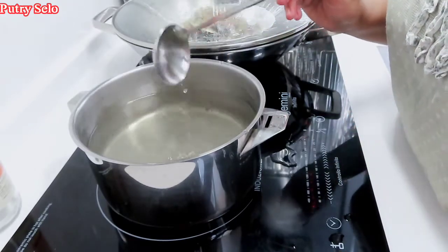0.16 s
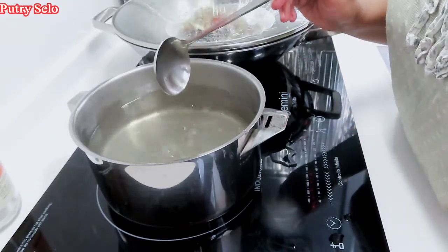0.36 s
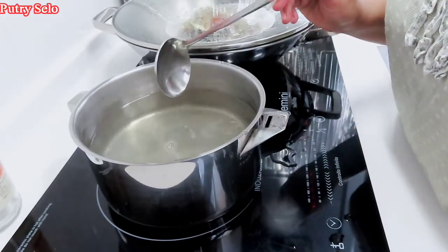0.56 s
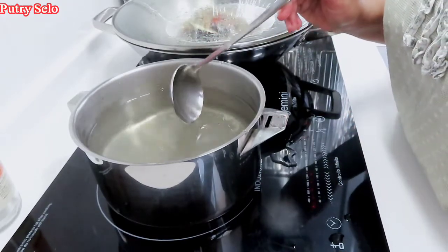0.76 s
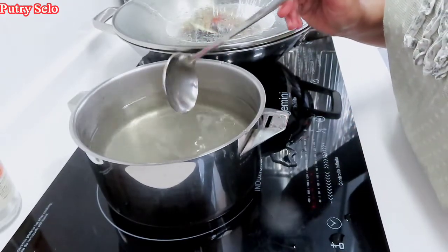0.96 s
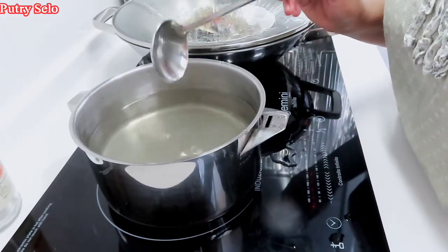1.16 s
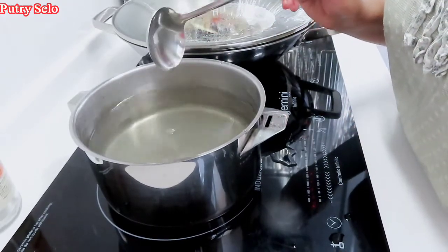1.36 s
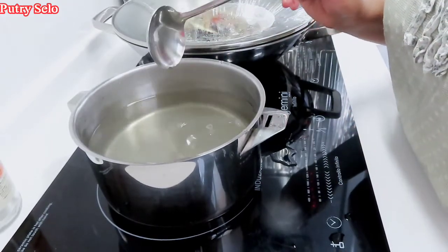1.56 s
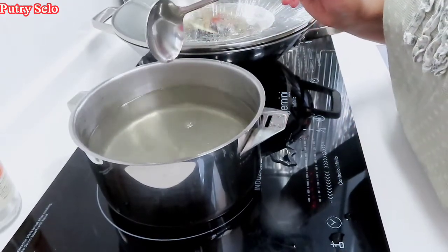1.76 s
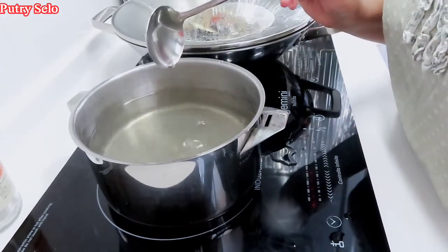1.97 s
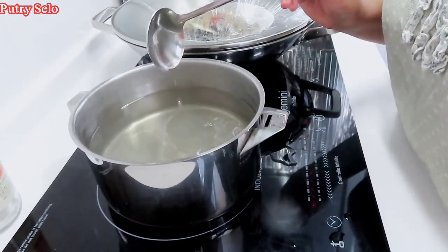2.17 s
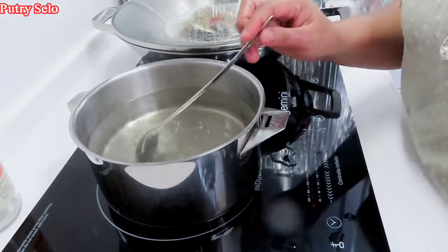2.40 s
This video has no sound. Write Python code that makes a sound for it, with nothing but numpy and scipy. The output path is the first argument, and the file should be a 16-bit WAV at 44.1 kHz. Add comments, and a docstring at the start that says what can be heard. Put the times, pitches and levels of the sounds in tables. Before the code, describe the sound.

An induction hob hums low and wavering while a drop of syrup plinks into a pot

```python
"""An induction hob heats a pot of syrup in a kitchen: three small motors, built from sine partials, hum
and beat against each other, and the coil buzzes faintly on multiples of twice the mains frequency.
Cooling air rushes beneath as shaped noise, wider in the treble. A soft knock on the pot, made of decaying
modes and a dull scuff, dies away. Syrup drips from a raised spoon: one plink, a rising bubble tone, then
a few tiny noise ticks and a faint fizz. The drips echo inside the pot and the kitchen."""
import sys
import numpy as np
from scipy import signal
from scipy.fft import rfft, irfft, next_fast_len
from scipy.io import wavfile
from scipy.ndimage import uniform_filter1d, map_coordinates

SR = 44100
rng = np.random.default_rng(int(sys.argv[2]) if len(sys.argv) > 2 else 0)


def int16_out(signal):
    """Quantize to a 16-bit WAV file."""
    q = np.round(np.clip(np.atleast_2d(signal).T, -1, 1) * 32767)
    wavfile.write(sys.argv[1], SR, q.astype(np.int16))


N = 107427

# Partials of the cooling fan's hum: multiple of FAN_HZ [1], rms level/dB
FAN_PARTIALS = [(1, -26.5), (2, -67.5), (3, -60.5), (4, -60.5), (8, -60.5), (9, -62)]
# Partials of the second motor's hum: multiple of MOTOR_HZ [1], rms level/dB
MOTOR_PARTIALS = [(1, -45.5), (2, -32.5), (3, -36.5), (4, -54.5), (8, -45.5), (9, -61), (10, -55.5),
                  (15, -74), (20, -61), (21, -65)]
# Partials of the third motor's whirr: multiple of WHIRR_HZ [1], rms level/dB
WHIRR_PARTIALS = [(4, -74.5), (8, -57), (12, -50), (16, -63.5)]
# Partials of the coil's buzz: multiple of COIL_HZ [1], rms level/dB
COIL_PARTIALS = [(1, -44.5), (9, -63), (10, -66), (12, -72.5), (13, -70.5), (15, -66.5), (20, -67.5),
                 (23, -69.5), (24, -73), (26, -74.5), (28, -76), (46, -79), (57, -83)]
# Weak tones that make the low hum waver: f/Hz, rms level/dB
BEAT_TONES = [(104.6, -44.5), (153.6, -58.5)]
# Cooling air common to both sides: f/Hz, density level/dB [per Hz]
AIR_MID = [(25, -79), (40, -86), (55, -61.5), (72, -66.5), (90, -58.5), (106, -57), (130, -64), (170, -67),
           (230, -82), (290, -71.5), (365, -75), (420, -72.5), (465, -63), (520, -72.5), (600, -70),
           (820, -74.5), (1050, -79), (1300, -83), (1900, -82.5), (2500, -87.5), (3200, -93.5), (4200, -99),
           (5500, -100), (8000, -106), (10500, -111), (13000, -114), (15500, -123)]
# Cooling air of opposite sign on the two sides: f/Hz, density level/dB [per Hz]
AIR_SIDE = [(40, -119), (65, -109), (115, -95), (220, -87.5), (330, -81), (600, -84.5), (830, -83),
            (1050, -89), (1700, -92), (3000, -96.5), (5000, -101), (10000, -112), (15000, -118)]
# Modes of the knocked pot: f/Hz, peak level/dB before the soft onset, decay time to -60 dB t/s
POT_MODES = [(278, -28.5, 0.42), (298, -23, 0.076), (830, -37, 0.25), (1900, -32, 0.064), (2014, -47, 0.36)]
# Drops striking the syrup: onset t/s, starting level/dB, centre f/Hz, bandwidth [octaves]
DROP_HITS = [(0.0975, -30.5, 5400, .95), (0.7935, -42, 4700, .35), (0.8125, -53, 5000, 0.27),
             (.8295, -56, 13000, .25)]

FAN_HZ, MOTOR_HZ, WHIRR_HZ, COIL_HZ = 123.9, 48.86, 54.22, 100.03
DRIFT_HZ = 0.06  # scale of each motor's random pitch drift
FLUTTER_DB = 0.43  # scale of each partial's random level flutter
KNOCK_S, KNOCK_RISE_S = 0.0, 0.0017
SCUFF_DB, SCUFF_HZ, SCUFF_OCTAVES, SCUFF_T60_S = -42, 1780, 0.62, 0.2
SPLAT_T60_S = 0.0047
PLINK_S, PLINK_DB = 0.0983, -22.5
BUBBLE_HZ, BUBBLE_RISE_HZ_PER_S = 2410, 15000
BUBBLE_SWELL_S, BUBBLE_HOLD_S, BUBBLE_T60_S = 0.001, 0.003, 0.012
CRATER_DB, CRATER_HZ, CRATER_OCTAVES, CRATER_T60_S = -26, 2700, 0.25, 0.012
POT_ECHO_DB, POT_ECHO_T60_S = -2.5, 0.053
KITCHEN_DB, KITCHEN_T60_S = -14, 0.36
ECHO_CORNER_HZ = 6950
FIZZ_S, FIZZ_WIDTH_S = 0.835, 0.03  # centre and standard deviation of the swell
FIZZ_DB, FIZZ_HZ, FIZZ_OCTAVES, FIZZ_PER_S = -67.5, 13000, 0.3, 900
TOP_HZ = 15600


def amp(db):
    """Decibels to gain."""
    return 10 ** (np.asarray(db) / 20)


def unit(x):
    """Scale to rms 1."""
    return x / np.sqrt(np.mean(x ** 2) + 1e-20)


def since(s):
    """Seconds elapsed since s, zero before it."""
    return np.maximum(np.arange(N) / SR - s, 0)


def wobble(rate):
    """A smooth random curve through rate random knots a second."""
    knots = rng.standard_normal(int(N * rate / SR) + 4)
    return map_coordinates(knots, [np.arange(N) * rate / SR])


def filtered(x, response):
    """Shape the spectrum of x with a function of frequency in Hz."""
    m = next_fast_len(N + SR // 2)
    spectrum = rfft(x, m) * response(np.fft.rfftfreq(m, 1 / SR))
    return irfft(spectrum, m)[..., :N]


def band(x, centre, width):
    """Keep a band that is bell-shaped over octaves; width is its standard deviation."""
    return filtered(x, lambda hz: np.exp(-0.5 * (np.log2((hz + 1) / centre) / width) ** 2))


def burst(s, db, centre, width, t60):
    """A decaying burst of noise in one band, its envelope starting at the given level."""
    t = since(s)
    envelope = (t > 0) * amp(db - 60 * t / t60)
    noise = band(envelope * rng.standard_normal(N), centre, width)
    return unit(noise) * np.sqrt(np.mean(envelope ** 2))


def tone(turns, db):
    """One partial with a random phase and a slightly unsteady level."""
    level = np.sqrt(2) * amp(db + FLUTTER_DB * wobble(7))
    return level * np.sin(2 * np.pi * (turns + rng.random()))


def hum(base_hz, partials, drift_hz):
    """Harmonic partials locked to one base rate, which may drift slowly."""
    turns = np.cumsum(base_hz + drift_hz * wobble(3.006)) / SR
    return sum(tone(round(k) * turns, db) for k, db in partials)


def machines():
    """Three drifting motors, the coil's buzz at fixed pitch and weak tones that beat with them."""
    motors = hum(FAN_HZ, FAN_PARTIALS, DRIFT_HZ)
    motors += hum(MOTOR_HZ, MOTOR_PARTIALS, DRIFT_HZ)
    motors += hum(WHIRR_HZ, WHIRR_PARTIALS, DRIFT_HZ)
    coil = hum(COIL_HZ, COIL_PARTIALS, 0)
    beats = sum(tone(hz * since(0), db) for hz, db in BEAT_TONES)
    return motors + coil + beats


def rush(points, patchy_db):
    """Noise of the given spectral density, with shallow random patches over time and frequency."""
    f, db = np.transpose(points)
    z = signal.stft(rng.standard_normal(N), nperseg=512)[2]
    patches = uniform_filter1d(rng.standard_normal(z.shape), 5, 0)  # smooth over frequency
    patches = uniform_filter1d(patches, 14, 1)  # smooth over time
    patchy = signal.istft(z * amp(patchy_db * unit(patches)), nperseg=512)[1][:N]
    white = np.sqrt(SR / 2) * unit(patchy)  # power of about 1 per Hz
    return filtered(white, lambda hz: amp(np.interp(np.log(hz + 1), np.log(f), db)))


def air():
    """Turbulent cooling air: mostly centred in the bass, more diffuse in the treble."""
    mid = rush(AIR_MID, patchy_db=1)
    side = rush(AIR_SIDE, patchy_db=1.9)
    return np.array([mid + side, mid - side])


def knock():
    """A soft knock sets off the pot's modes, each fading at its own rate, along with a dull scuff."""
    t = since(KNOCK_S)
    onset = 1 - np.exp(-t / KNOCK_RISE_S)
    modes = sum(amp(db - 60 * t / t60) * np.sin(2 * np.pi * hz * t) for hz, db, t60 in POT_MODES)
    scuff = burst(KNOCK_S, SCUFF_DB, SCUFF_HZ, SCUFF_OCTAVES, SCUFF_T60_S)
    return onset * modes + scuff


def drops():
    """Each drop hits the surface with a very short tick of band noise."""
    return sum(burst(s, db, centre, width, SPLAT_T60_S) for s, db, centre, width in DROP_HITS)


def plink():
    """The crater left by a drop snaps shut; the trapped bubble rings briefly and rises in pitch."""
    t = since(PLINK_S)
    swell = np.minimum(t / BUBBLE_SWELL_S, 1)
    decay = amp(PLINK_DB - 60 * np.maximum(t - BUBBLE_HOLD_S, 0) / BUBBLE_T60_S)
    turns = BUBBLE_HZ * t + BUBBLE_RISE_HZ_PER_S * t ** 2 / 2
    bubble = swell * decay * np.sin(2 * np.pi * turns)
    crater = burst(PLINK_S, CRATER_DB, CRATER_HZ, CRATER_OCTAVES, CRATER_T60_S)
    return bubble + crater


def echo(x, t60, delay_s, side_db):
    """Dense reflections: a decaying stereo noise tail that starts after a short delay."""
    t = since(delay_s)[:SR // 2]
    mid, side = rng.standard_normal((2, len(t))) * (t > 0) * amp(-60 * t / t60)
    side = amp(side_db) * side
    tail = np.array([mid + side, mid - side])
    return signal.fftconvolve(x[None], tail / np.linalg.norm(tail[0]), axes=1)[:, :N]


def fizz():
    """Tiny bubbles pop at random, separately on each side, in a short faint cloud around the last drops."""
    pops = (rng.random((2, N)) < FIZZ_PER_S / SR) * rng.standard_normal((2, N))
    swell = np.exp(-0.5 * ((since(0) - FIZZ_S) / FIZZ_WIDTH_S) ** 2)
    return amp(FIZZ_DB) * swell * unit(band(pops, FIZZ_HZ, FIZZ_OCTAVES))


def scene():
    """Drips echo, a little duller, in the pot and the kitchen, over the steady hob."""
    drips = drops() + plink()
    dull = filtered(drips, lambda hz: 1 / (1 + 1j * hz / ECHO_CORNER_HZ))  # one-pole low-pass
    pot = amp(POT_ECHO_DB) * echo(dull, POT_ECHO_T60_S, delay_s=0.00088, side_db=-11.5)
    kitchen = amp(KITCHEN_DB) * echo(dull, KITCHEN_T60_S, delay_s=0.0046, side_db=-9)
    return machines() + air() + knock() + drips + pot + kitchen + fizz()


def record(dry):
    """A steep low-pass leaves nothing above the band limit."""
    return filtered(dry, lambda hz: hz < TOP_HZ)


dry = scene()
out = record(dry)
int16_out(out)
```